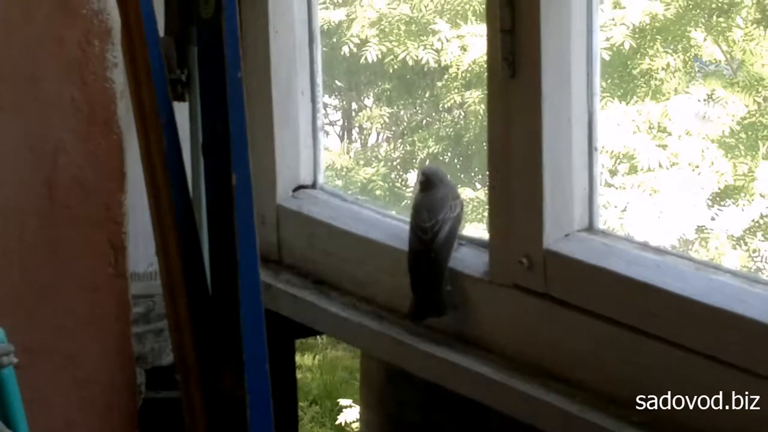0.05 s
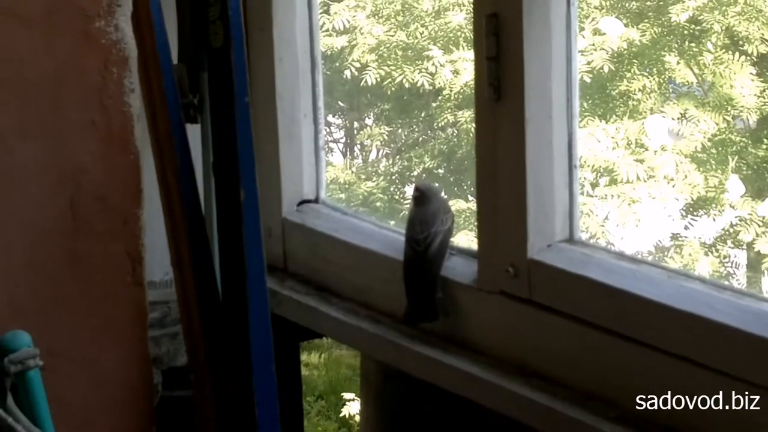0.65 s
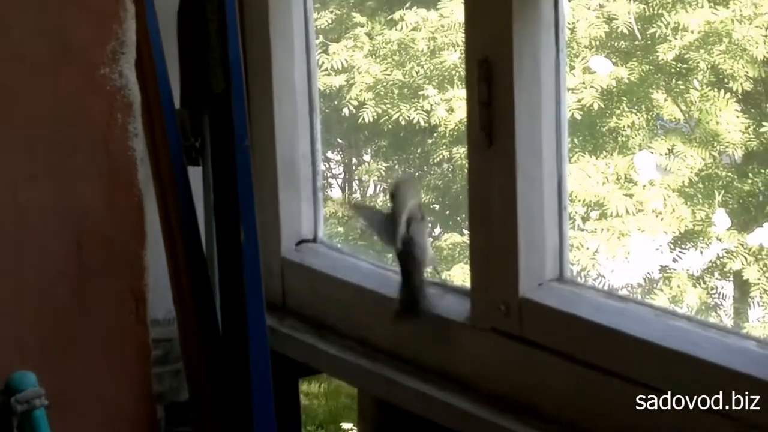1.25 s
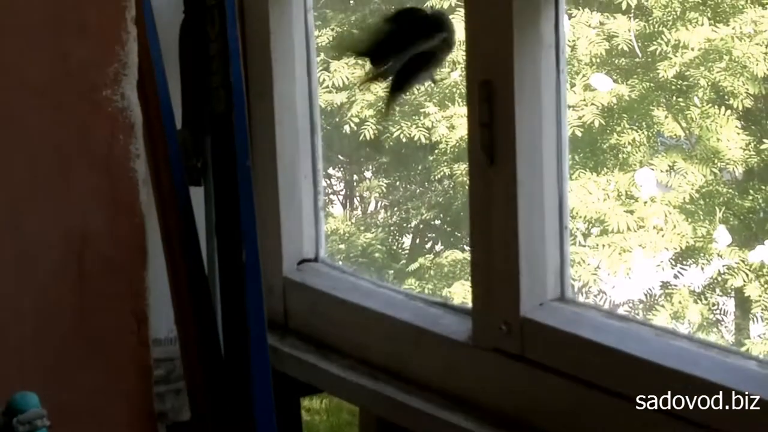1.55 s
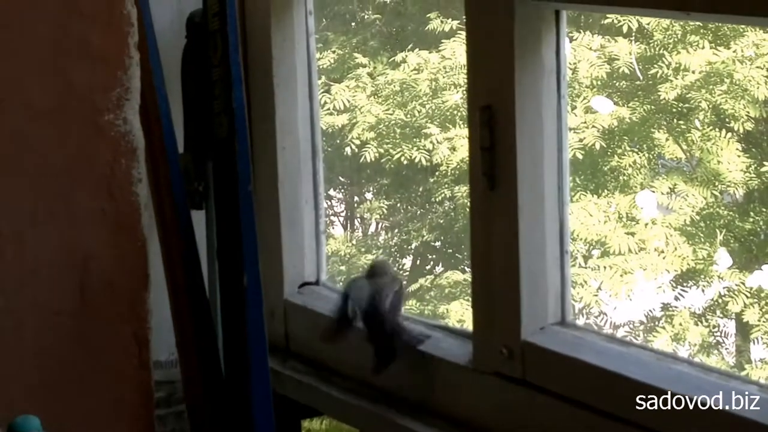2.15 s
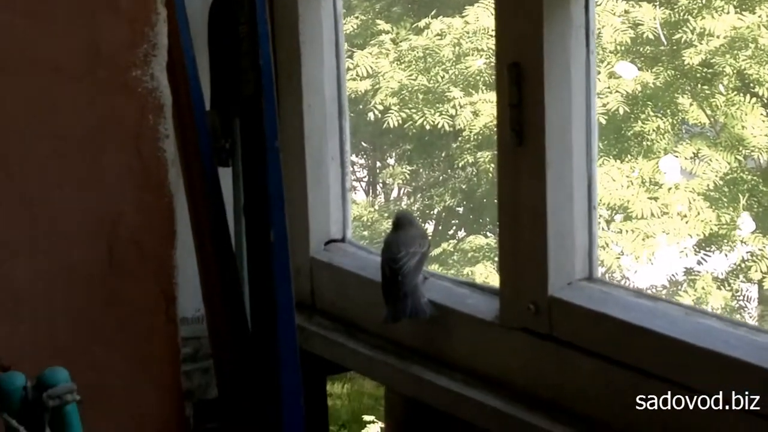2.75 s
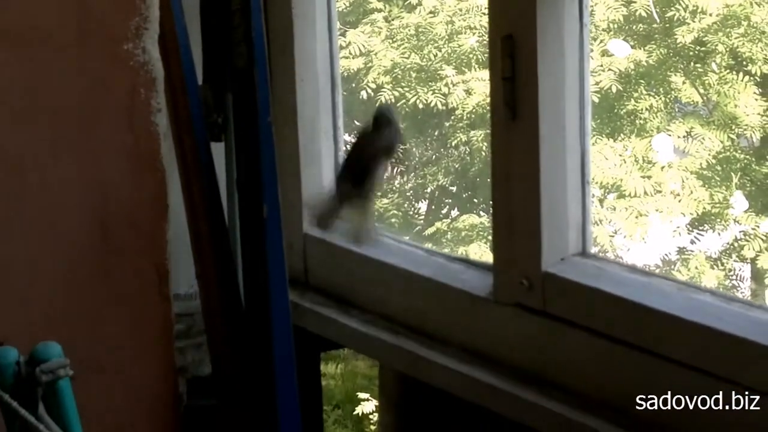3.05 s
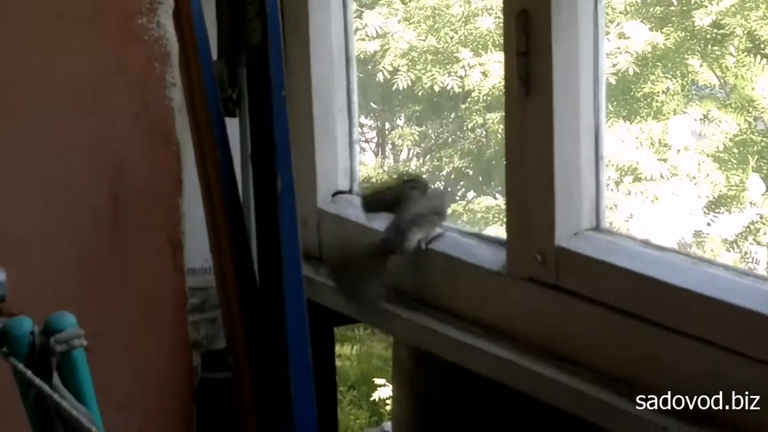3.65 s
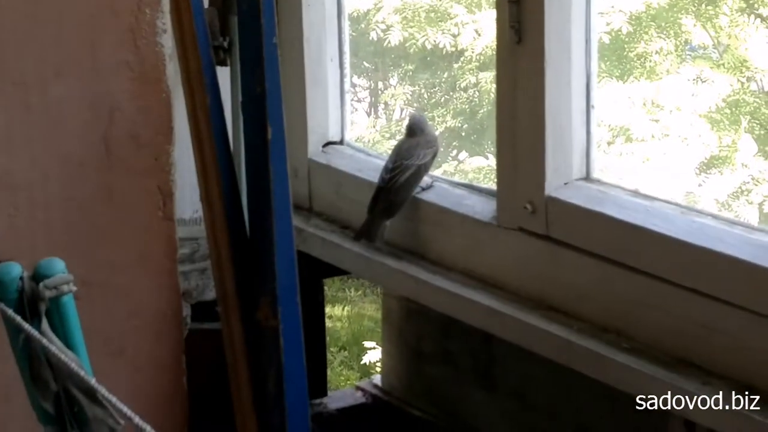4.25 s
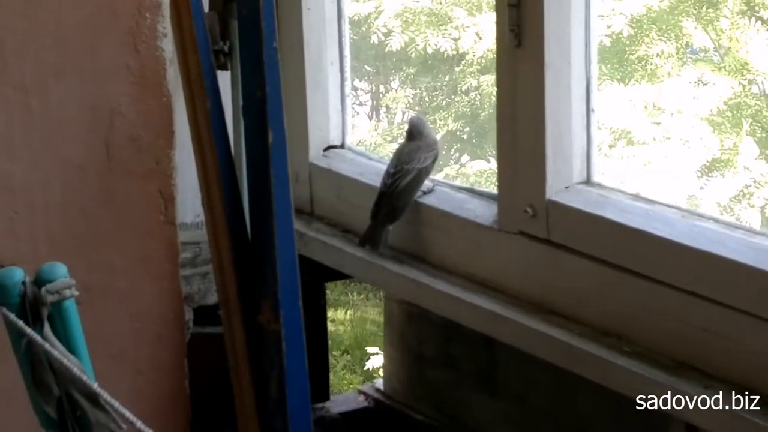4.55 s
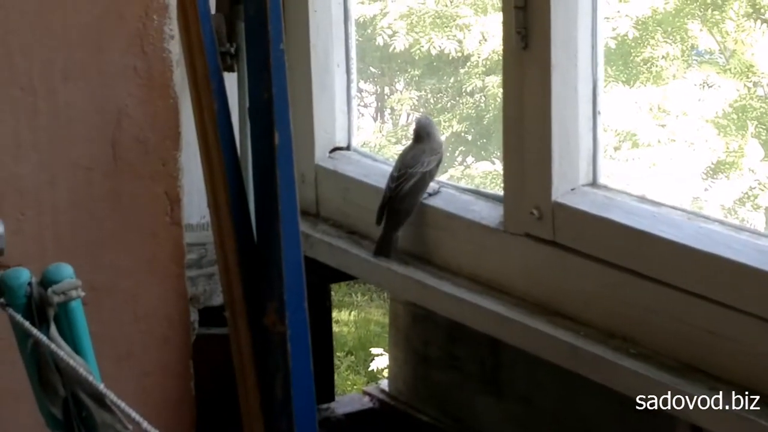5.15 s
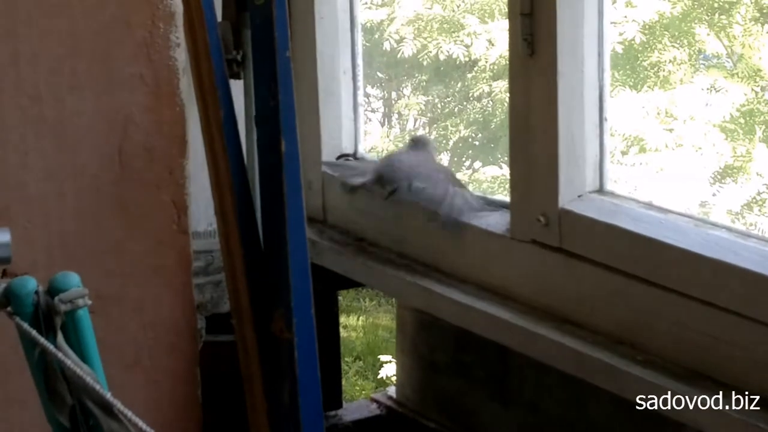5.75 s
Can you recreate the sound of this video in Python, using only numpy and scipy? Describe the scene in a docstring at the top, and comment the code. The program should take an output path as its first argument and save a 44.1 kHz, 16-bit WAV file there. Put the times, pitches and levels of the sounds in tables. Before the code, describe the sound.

In a narrow enclosed balcony, a small bird flutters against a window in three short flurries with pauses between them. Its wings slap and brush the pane, knocking the glass and frame, while its claws skid in brief bright ticks and faint squeaks. A dull outdoor wash and a distant engine hum come faintly through the glass. Fingers softly bump the hand-held microphone, mostly in the first half.

```python
"""An enclosed balcony: a small bird flutters against the window in three flurries.
Wings slap and brush the pane, ringing glass and frame; claws skid in runs of bright ticks,
and the narrow room rings briefly. Outdoor wash and a far engine come through the glass.
Fingers bump the hand-held camera, whose two microphone ports pick up the scene."""
import sys
import numpy as np
from scipy import signal
from scipy.fft import rfft, irfft
from scipy.io import wavfile

SR = 44100
rng = np.random.default_rng(int(sys.argv[2]) if len(sys.argv) > 2 else 0)


def persist_wave(psi):
    """Save psi, clipped to +-1, as 16-bit WAV."""
    counts = np.round(np.clip(psi, -1, 1) * 32767).astype(np.int16)
    wavfile.write(sys.argv[1], SR, np.atleast_2d(counts).T)


N = 256220


def gain_of(db):
    """dB to amplitude."""
    return 10 ** (np.asarray(db) / 20)


def unit_rms(x):
    """Scale to rms 1."""
    return x / np.sqrt(np.mean(x ** 2) + 1e-20)


def unit_energy(x):
    """Scale each channel to energy 1."""
    return x / np.sqrt(np.sum(x ** 2, axis=-1, keepdims=True) + 1e-20)


def curve_at(points, hz):
    """Interpolate a table over log frequency."""
    points_hz, values = np.transpose(points)
    return np.interp(np.log(hz + 1), np.log(points_hz + 1), values)


def resonance_db(modes, hz):
    """Summed boost of resonance peaks."""
    return sum(db / (1 + (2 * (hz - centre_hz) / width_hz) ** 2) for centre_hz, width_hz, db in modes)


def minimum_phase(db):
    """Response with this gain that rings only after the blow."""
    log_gain = np.log(gain_of(np.concatenate([db, db[-2:0:-1]])))
    return np.exp(np.conj(signal.hilbert(log_gain)))[:len(db)]


def ticks(shape, per_s):
    """Impulses of random time and size."""
    return rng.standard_normal(shape) * (rng.random(shape) < per_s / SR)


def add(mix, start_s, sound):
    """Mix a sound in at start_s."""
    part = mix[:, max(round(start_s * SR), 0):][:, :sound.shape[-1]]
    part += sound[..., :part.shape[-1]]


# Likeness of the ports: (frequency [Hz], coherence [0..1])
PORT_COHERENCE = [(30, .15), (150, .8), (900, .88), (1400, .8), (1650, .25), (2500, .3), (3200, .12),
                  (15000, .12)]
# Phase between the ports: (frequency [Hz], left lead [rad])
PORT_LEAD = [(100, 0), (1000, .2), (1350, -.1), (1800, 2.0), (2600, 3.0), (4500, 2.0), (7000, 1.4)]
# Port balance: (frequency [Hz], left minus right [dB])
PORT_BALANCE = [(40, 9), (150, 5), (500, 4), (1100, 1), (1400, .5), (1750, -3.5), (2600, 0), (3800, 0),
                (5000, 11), (7500, 12), (11000, 2.5), (15000, 1.5)]


def ports(spectra, hz):
    """Two independent spectra to the partly coherent left and right microphone ports."""
    coherence = curve_at(PORT_COHERENCE, hz)
    tilt = gain_of(curve_at(PORT_BALANCE, hz))
    right = coherence * spectra[0] + np.sqrt(1 - coherence ** 2) * spectra[1]
    right *= np.exp(-1j * curve_at(PORT_LEAD, hz))
    return np.array([tilt * spectra[0], right]) / np.sqrt((1 + tilt ** 2) / 2)


# Outdoor noise spectrum: (frequency [Hz], relative density [dB])
WASH_SPECTRUM = [(12, -11), (30, 0), (55, -5.5), (110, -6), (190, -14.5), (280, -12), (400, -14),
                 (600, -16.5), (900, -13.5), (1200, -23.5), (1700, -23.5), (3000, -30.5), (7000, -39),
                 (15500, -44)]
# Room resonances: (frequency [Hz], width [Hz], boost [dB])
ROOM_MODES = [(220, 45, 7.5), (277.6, 7.1, 12), (318, 12, 6), (820, 19, 6), (935, 24, 1.5),
              (1160, 100, 8.5)]


def outdoor_wash(level_db=-62.5, hiss_db=-84, swell_db=0.96, swells_per_s=9):
    """Dull, gently swelling outdoor noise coloured by the room, over microphone hiss."""
    t, hz = np.arange(N) / SR, np.fft.rfftfreq(N, 1 / SR)
    colour = gain_of(curve_at(WASH_SPECTRUM, hz) + resonance_db(ROOM_MODES, hz))
    spectra = rfft(rng.standard_normal((2, N))) * colour
    airborne_share = 1 / (1 + (hz / 2200) ** 4)  # capsule hiss takes over above
    dip = np.interp(t * swells_per_s, np.arange(200), rng.standard_normal(200))
    airborne = irfft(airborne_share * ports(spectra, hz), N) * gain_of(-swell_db * dip)
    capsules = irfft((1 - airborne_share) * spectra, N)
    hiss = gain_of(hiss_db) * rng.standard_normal((2, N))
    return gain_of(level_db) * unit_rms(airborne + capsules) + hiss


# Fingers on the camera body: (time [s], relative level [dB])
FINGER_BUMPS = [(0.043, -53), (0.258, -38), (0.531, -42), (0.67, -58), (1.067, -42), (1.238, -39.5),
                (2.387, -52), (2.567, -41.5), (2.744, -49.5), (5.073, -41)]


def finger_bumps(gain_db=3, press_db=-4, release_s=0.019, rise_s=0.0078, nominal_hz=99,
                 case_hz=270, case_db=-14, right_db=-17):
    """Press and release beside the left port: two soft, low pushes, each with a faint case knock."""
    t, out = np.arange(SR // 8) / SR, np.zeros((2, N))
    envelope = (t / rise_s) ** 2 * np.exp(1 - (t / rise_s) ** 2)
    knock = gain_of(case_db) * np.sin(2 * np.pi * case_hz * t)
    for start_s, db in FINGER_BUMPS:
        for delay_s, push_db in [(0, press_db), (release_s, 0)]:
            swing_hz = nominal_hz * rng.uniform(0.61, 1.23)
            swing = np.sin(2 * np.pi * (swing_hz * t + rng.random()))
            add(out, start_s + delay_s, gain_of(gain_db + db + push_db) * (swing + knock) * envelope)
    return out * gain_of([[0], [right_db]])


# Rubs on glass, wings folding: (time [s], length [s], centre [Hz], width [Hz], level [dB])
RUBS = [(0.628, 0.021, 1680, 1500, -68.5), (1.069, 0.041, 880, 390, -58), (1.428, 0.2, 5070, 700, -71),
        (1.469, 0.034, 4970, 300, -57), (1.613, 0.036, 4840, 6000, -68), (1.706, 0.075, 4700, 3020, -68),
        (2.115, 0.098, 7100, 6000, -77), (2.975, 0.024, 2590, 2400, -71), (3.109, 0.035, 5100, 500, -64),
        (3.303, 0.029, 4850, 1240, -75), (3.381, 0.047, 3640, 1200, -70.5), (3.515, 0.083, 2060, 790, -57),
        (3.522, 0.08, 5130, 1330, -64), (5.612, 0.045, 4930, 1276, -60)]


def rubs():
    """Sliding feather or claw: a fuzzy squeak when narrowband, a soft brush when wide."""
    out = np.zeros((2, N))
    for start_s, length_s, centre_hz, width_hz, db in RUBS:
        size = 2 * int(length_s * SR / 2)
        hz = np.fft.rfftfreq(size, 1 / SR)
        spectra = rfft(rng.standard_normal((2, size))) / (1 + (2 * (hz - centre_hz) / width_hz) ** 2)
        rub = unit_rms(irfft(ports(spectra, hz)))
        add(out, start_s, gain_of(db) * rub * signal.windows.tukey(size, 0.5))
    return out


# Wingbeats: (time [s], tip [dB], flat [dB], body weight [dB], feather brushing [dB])
WINGBEATS_ON_PANE = [(1.3243, -38.5, -34.5, 1, -7), (1.376, -25.5, -27, 2.5, -3.5),
                     (1.4421, -35, -40.5, 12, -4.5), (1.501, -31.5, -35.5, 5.5, -2.5),
                     (1.6467, -44.5, -45, 14.5, 1.5), (1.7783, -38.5, -37, 1.5, 2),
                     (1.8218, -27.5, -31.5, -10.5, -2), (1.8733, -25.5, -29.5, 2.5, -0.5),
                     (3.0921, -36.5, -35, 2, -1.5), (3.1467, -29.5, -28.5, 2, 2.5),
                     (3.2098, -30.5, -42.5, 2, 4), (3.458, -42, -33, 2, 0),
                     (3.5996, -31.5, -25, -5.5, -0.5), (3.673, -25.5, -33, -11.5, 2),
                     (5.3304, -27, -24, -9, -6), (5.3911, -27, -31, -2.5, 0.5),
                     (5.447, -36, -31.5, -3.5, 2), (5.5185, -37, -45, 2, 3), (5.6325, -41.5, -36, 7, -0.5),
                     (5.7879, -37, -29.5, -10.5, 1)]


def wing_contacts(lag_s=0.014, hard_beat_db=-27, hard_rebound_db=-3.5, rebound_db_per_db=0.61):
    """Tip, flat, then rebound of each beat. Yields (time [s], rap [dB], shares re rap [dB])."""
    for start_s, tip_db, flat_db, weight_db, brush_db in WINGBEATS_ON_PANE:
        # share order: frame thud, pane knock, rustle, feather fizz
        shift_db = weight_db * np.array([0.72, 0.52, 0, 0.37]) + brush_db * np.array([0.18, 0, 1.57, 1.24])
        rebound_db = flat_db + hard_rebound_db + rebound_db_per_db * (flat_db - hard_beat_db)
        yield start_s, tip_db, shift_db + (-10.5, -3, -6.5, -19.5)
        yield start_s + lag_s, flat_db, shift_db + (-6.5, -1, -0.5, -20.5)
        yield start_s + 2 * lag_s, rebound_db, shift_db + (-6, 0.5, -2.5, -26)


# Bands of rap, frame thud, pane knock, rustle, feather fizz: (low [Hz], high [Hz])
CONTACT_BANDS = [(1200, 2500), (130, 600), (600, 1200), (2500, 5300), (6000, 19000)]
# Struck pane and frame: (frequency [Hz], gain [dB])
WINDOW_COLOUR = [(100, -7.5), (200, -2.5), (350, 0), (550, -4), (750, -5), (1100, -5), (1400, -6.5),
                 (1700, -5), (2600, -5.5), (4200, -9), (5500, -9.5), (7500, -6), (11000, -10.5),
                 (15500, -29)]
# Pane and frame resonances: (frequency [Hz], width [Hz], boost [dB])
WINDOW_MODES = [(374, 35, 5), (492, 30, 3), (696, 45, 4), (753, 40, 3), (898, 55, 4), (1088, 45, 3),
                (1309, 45, 7), (1415, 45, 7), (1703, 50, 3), (1864, 60, 3), (2003, 50, 3), (3720, 400, 5)]


def wings(size=16384, gain_db=18, slap=0.6, brush_s=0.003, barbs_per_s=1400):
    """Each contact, a slap plus feather ticks, rings the window from a new place."""
    t, hz = np.arange(size) / SR, np.fft.rfftfreq(size, 1 / SR)
    window = minimum_phase(curve_at(WINDOW_COLOUR, hz) + resonance_db(WINDOW_MODES, hz))
    filters = [signal.butter(3, edges_hz, "band", fs=SR, output="sos") for edges_hz in CONTACT_BANDS]
    bands = [signal.sosfreqz(sos, hz, fs=SR)[1] for sos in filters]
    lead_samples = 256  # room for the port that hears the blow first
    fade = signal.windows.tukey(size, lead_samples / size)
    out = np.zeros((2, N))
    for start_s, rap_db, shares_db in wing_contacts():
        brush = unit_energy(ticks(size, barbs_per_s) * np.sqrt(t) * np.exp(-t / brush_s))
        drive = brush + slap * (t == 0)
        spectra = ports(rfft(drive) * rfft(balcony(t)) * window, hz)
        # equalise each band to its share of this contact
        levels = gain_of(gain_db + rap_db + np.array([0, *shares_db]))
        power = sum(abs(level * band) ** 2 / np.mean(abs(spectra * band) ** 2)
                    for level, band in zip(levels, bands))
        equaliser = minimum_phase(10 * np.log10(power + power.max() * 1e-8))
        contact = np.roll(irfft(spectra * equaliser), lead_samples, axis=1)
        add(out, start_s - lead_samples / SR, contact * fade)
    return out


# Balcony reverberation: (frequency [Hz], T60 [s])
BALCONY_T60 = [(200, 0.22), (530, 0.26), (1400, 0.22), (3700, 0.12), (10000, 0.19)]


def balcony(t, direct=0.5, early=0.59, early_s=0.0055, early_per_s=900, taps_per_s=3500):
    """Impulse response: direct sound, a few strong reflections off close walls, short tail."""
    shape = (2, len(t))
    taps = rng.choice([-1., 1.], shape) * (rng.random(shape) < taps_per_s / SR)
    hz, frame_s, spectra = signal.stft(taps, SR, nperseg=256)
    decay = gain_of(-60 * frame_s / curve_at(BALCONY_T60, hz)[:, None])
    tail = signal.istft(spectra * decay, SR)[1][:, :len(t)]
    walls = ticks(shape, early_per_s) * np.exp(-t / early_s)
    return direct * (t == 0) + early * unit_energy(walls) + unit_energy(tail)


# Claw skids: (time [s], length [s], relative level [dB])
CLAW_SKIDS = [(1.822, 0.021, -20.5), (3.146, 0.031, -26.5), (3.453, 0.029, -30), (3.608, 0.019, -25),
              (3.676, 0.017, -33), (5.8, 0.011, -25.5)]
# Claw on glass: (frequency [Hz], gain [dB])
CLAW_COLOUR = [(100, -40), (1000, -12), (1800, 0), (2700, 1), (4000, 5), (6500, 2), (9000, -5.5),
               (13000, -2.5), (15700, -10)]


def claws(size=8192, ticks_per_s=1500, fade_db=-3, gain_db=11):
    """Stick-slip on glass: a short run of bright ticks, reflected by the balcony."""
    t, hz = np.arange(size) / SR, np.fft.rfftfreq(size, 1 / SR)
    colour = minimum_phase(curve_at(CLAW_COLOUR, hz))
    out = np.zeros((2, N))
    for start_s, length_s, db in CLAW_SKIDS:
        envelope = (t < length_s) * gain_of(fade_db * np.minimum(t / length_s, 1))
        drive = ticks(size, ticks_per_s) * envelope
        spectra = ports(rfft(drive) * rfft(balcony(t)) * colour, hz)
        skid = irfft(spectra)[:, :size // 2]
        add(out, start_s, gain_of(gain_db + db) * skid / np.linalg.norm(skid))
    return out


# Engine orders, before left/right gain: (time [s], fundamental [dB], octave [dB])
ENGINE_ORDERS = [(2.3, -89, -83), (2.8, -74, -66.5), (3.5, -65, -67.5), (4.1, -66.5, -74.5),
                 (4.4, -63, -90), (5.3, -64, -84), (5.8, -70, -65.5)]


def far_engine(start_hz=71.9, rise_hz_per_s=1.25, waver=0.0093, left_db=3, right_db=-5):
    """Far engine creeping up in speed; only its two lowest orders pass the glass."""
    t = np.arange(N) / SR
    times_s, *orders_db = np.transpose(ENGINE_ORDERS)
    fundamental, octave = (gain_of(np.interp(t, times_s, db)) for db in orders_db)
    drift = np.interp(t, np.linspace(0, t[-1], 60), rng.standard_normal(60))
    hz = (start_hz + rise_hz_per_s * t) * (1 + waver * drift)
    phase = 2 * np.pi * np.cumsum(hz) / SR
    hum = np.sqrt(2) * (fundamental * np.sin(phase) + octave * np.sin(2 * phase))
    return hum * gain_of([[left_db], [right_db]])


def scene():
    """Bird at the window, camera handling, quiet background."""
    return outdoor_wash() + finger_bumps() + rubs() + wings() + claws() + far_engine()


def record(dry):
    """Camera band limit."""
    lowpass = signal.firwin(511, 15750, window=("kaiser", 9), fs=SR)
    return signal.oaconvolve(dry, lowpass[None], "same")


dry = scene()
out = record(dry)
persist_wave(out)
```